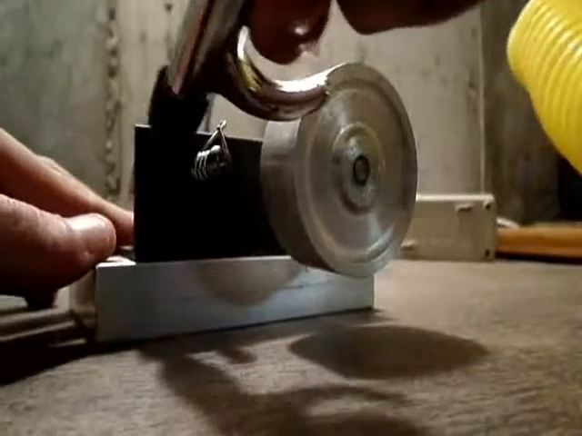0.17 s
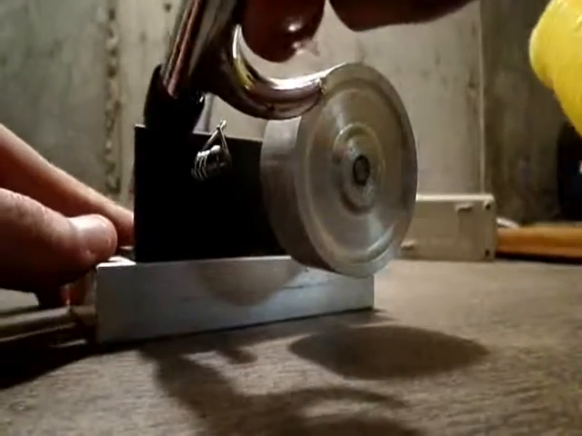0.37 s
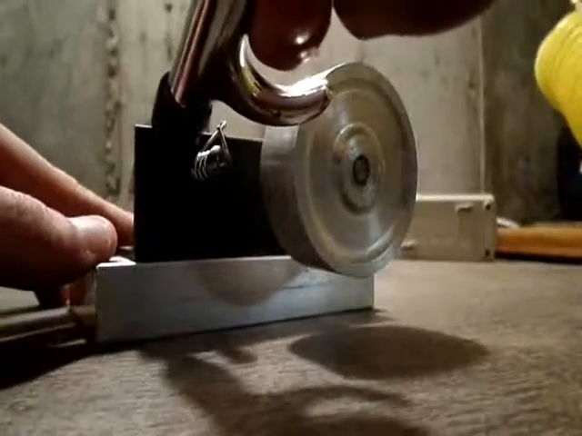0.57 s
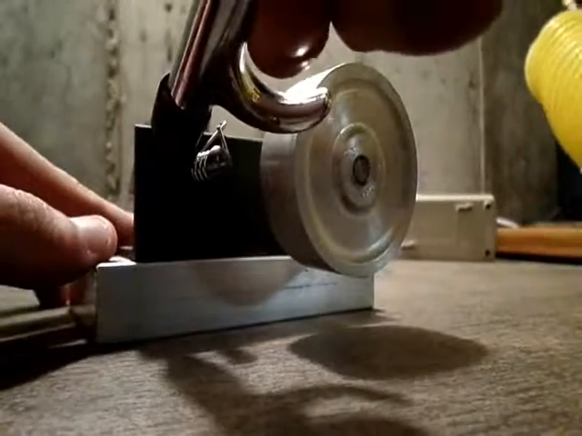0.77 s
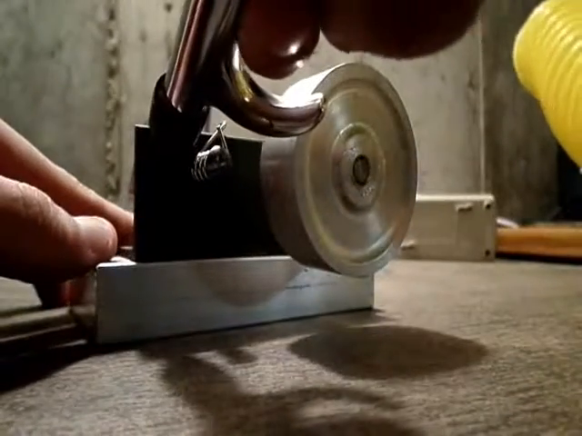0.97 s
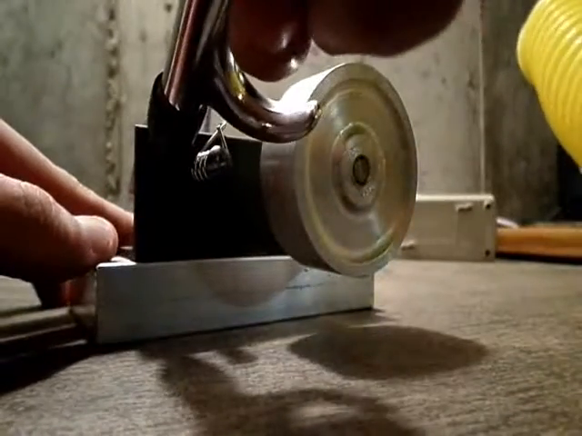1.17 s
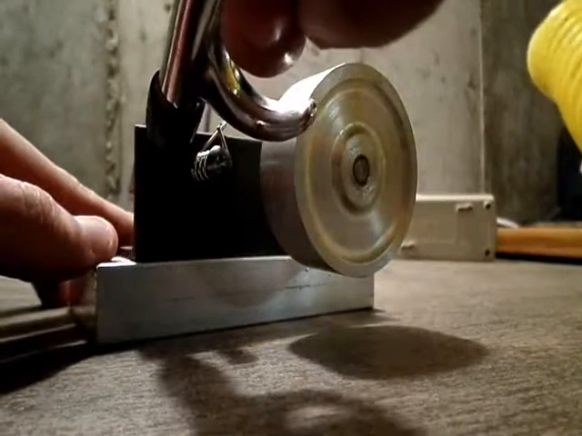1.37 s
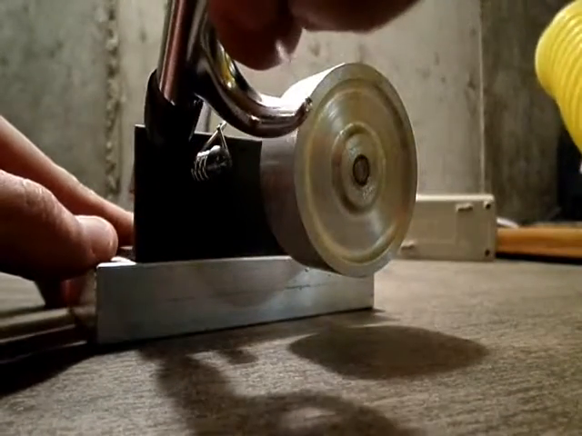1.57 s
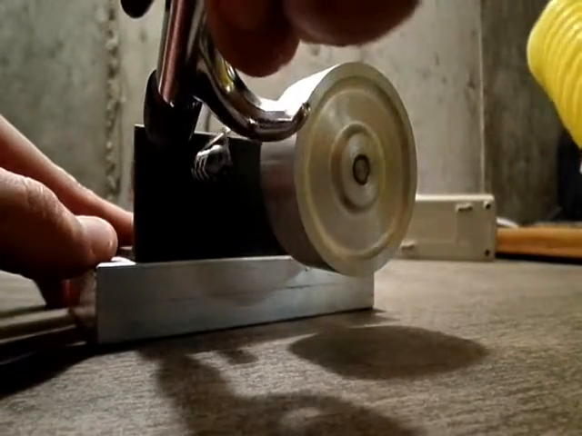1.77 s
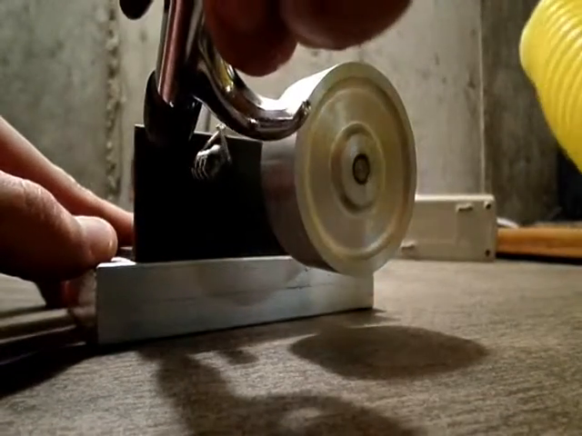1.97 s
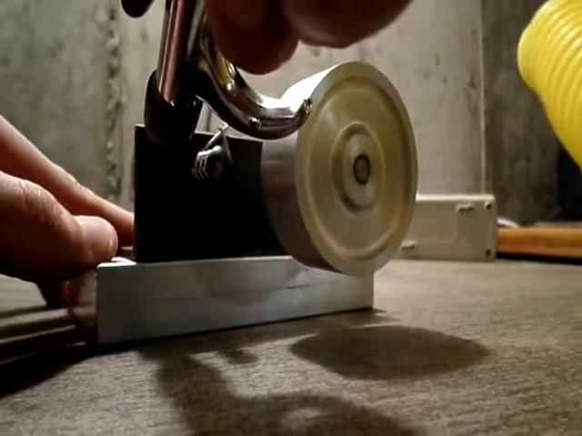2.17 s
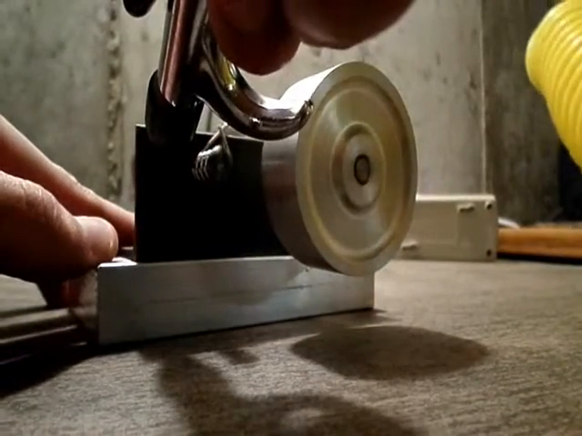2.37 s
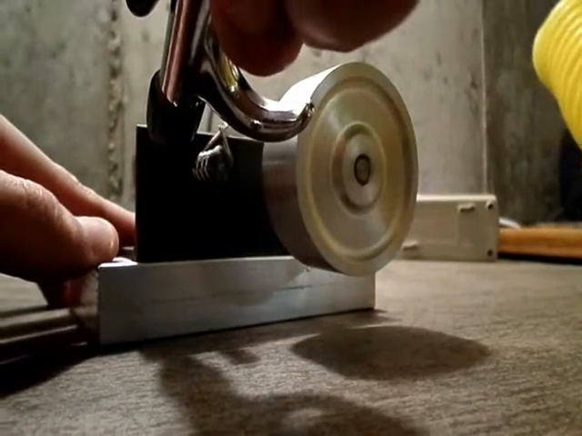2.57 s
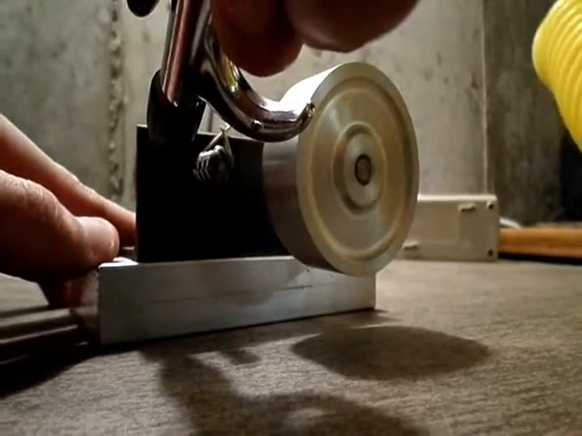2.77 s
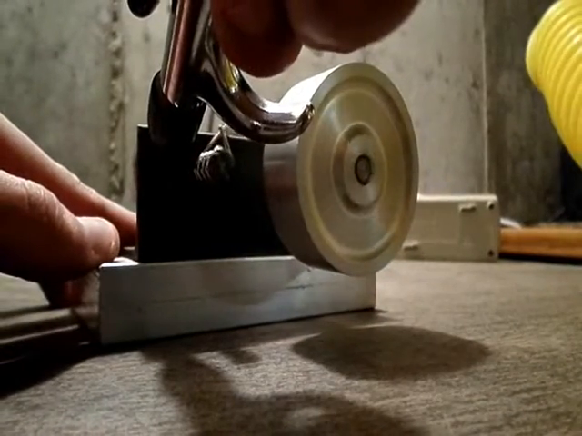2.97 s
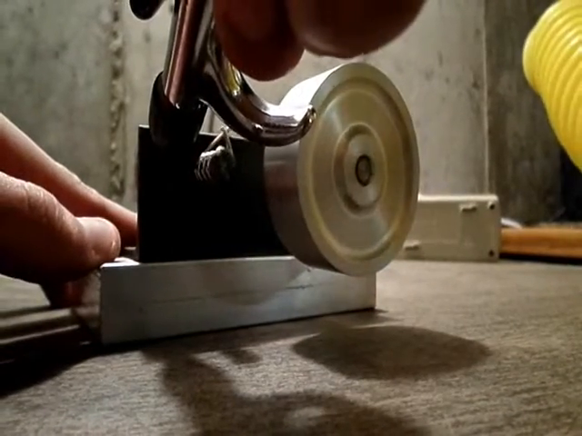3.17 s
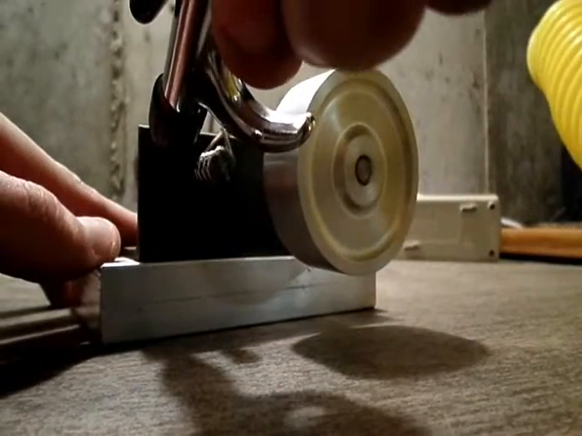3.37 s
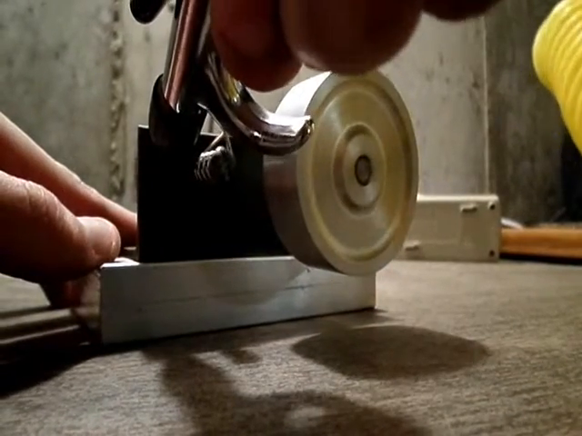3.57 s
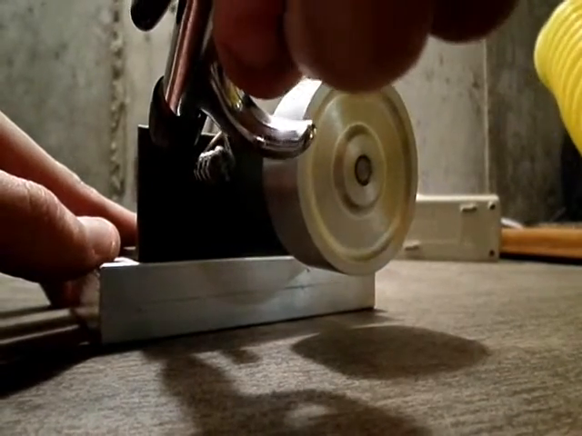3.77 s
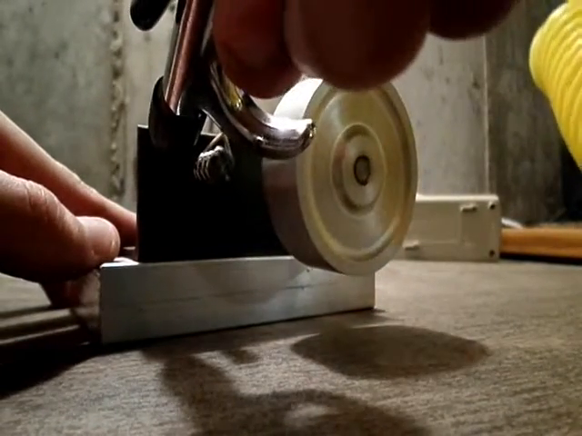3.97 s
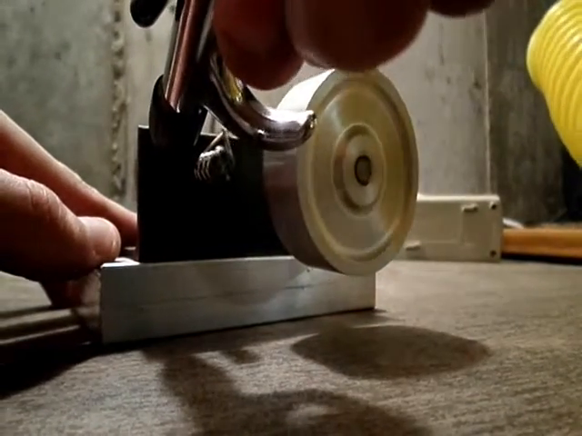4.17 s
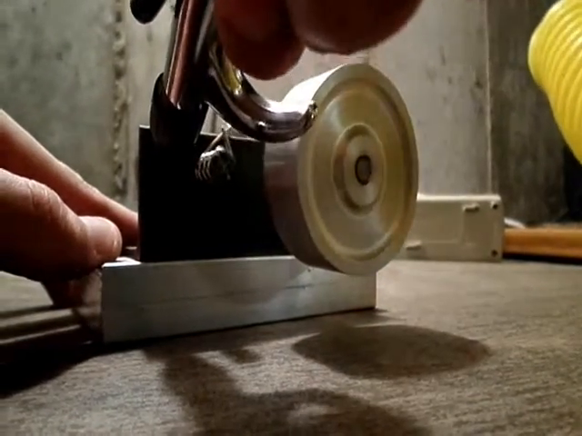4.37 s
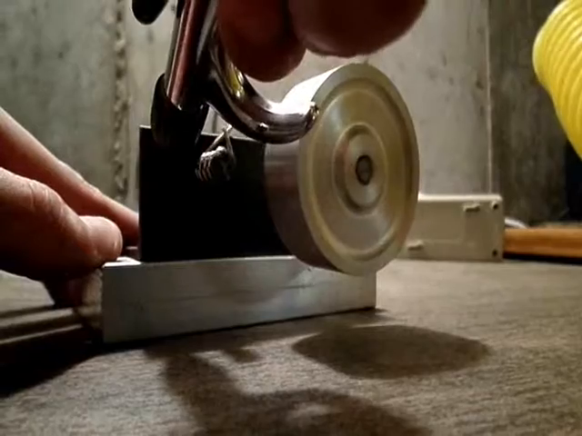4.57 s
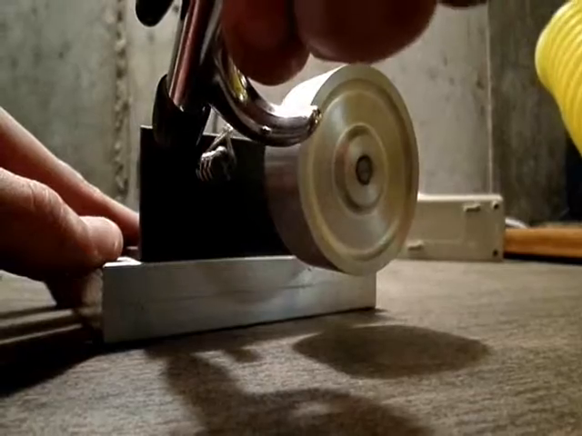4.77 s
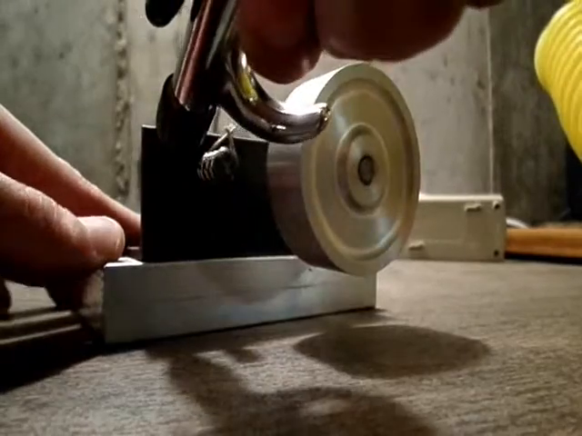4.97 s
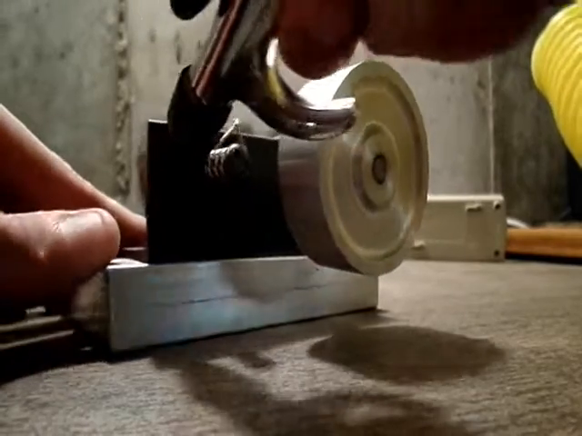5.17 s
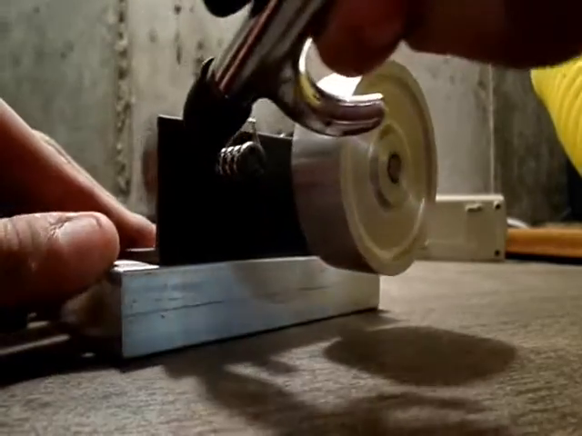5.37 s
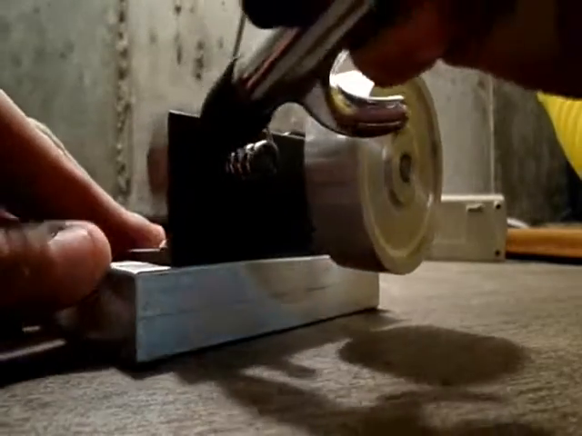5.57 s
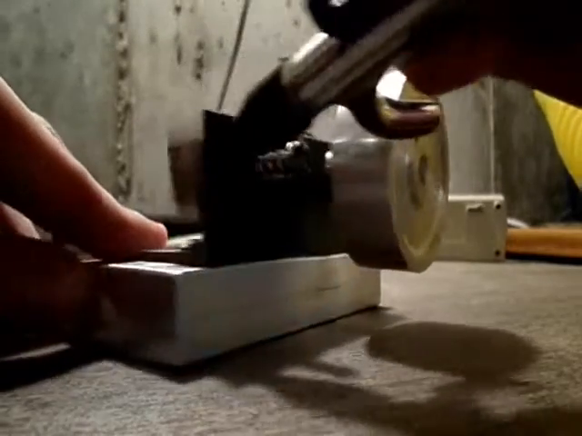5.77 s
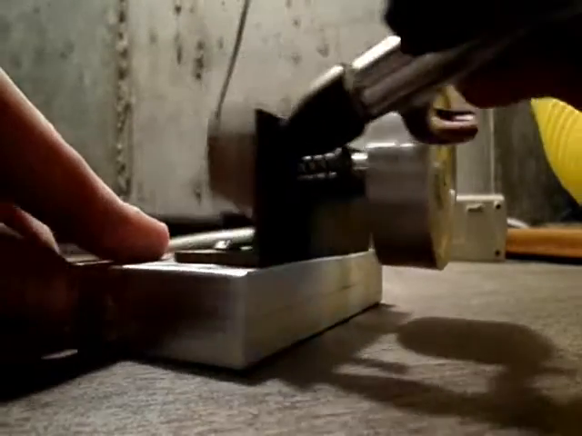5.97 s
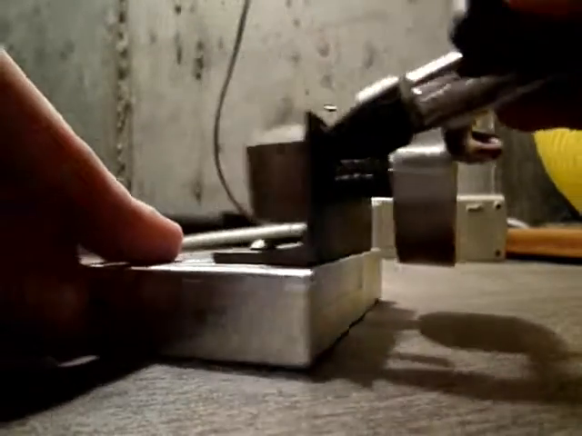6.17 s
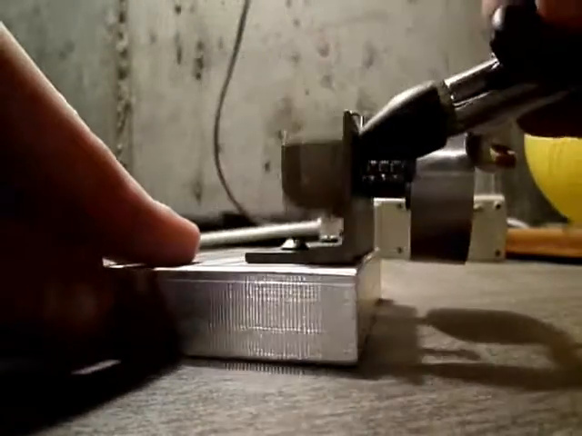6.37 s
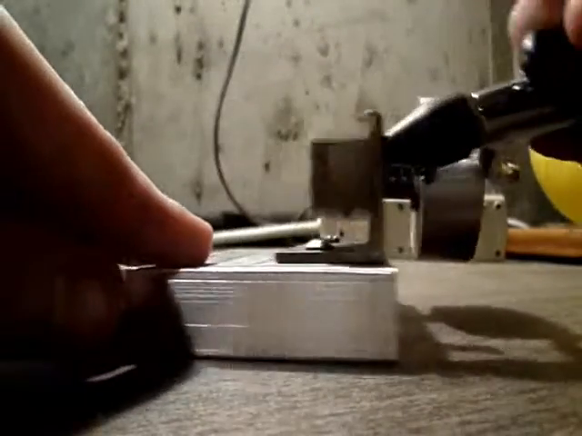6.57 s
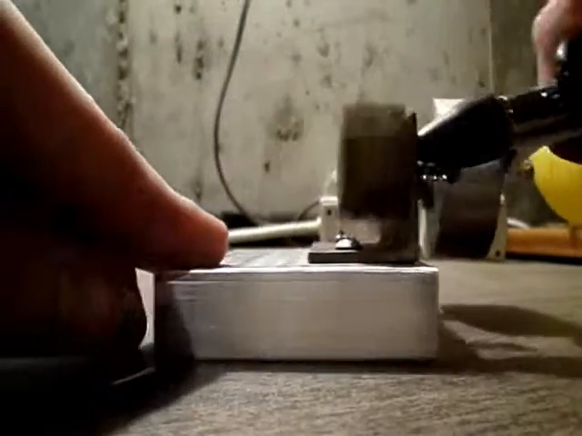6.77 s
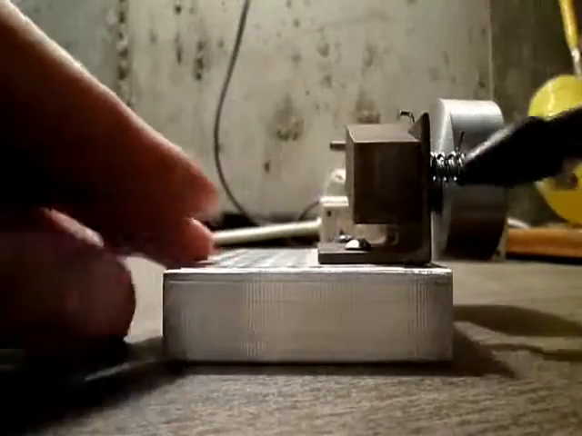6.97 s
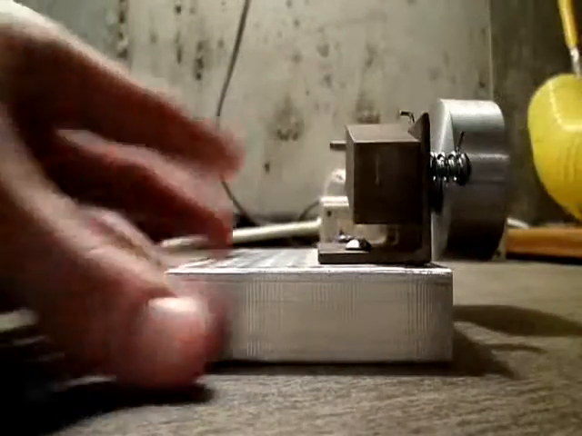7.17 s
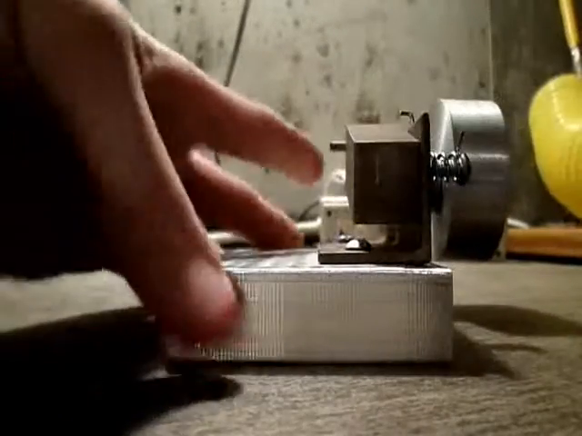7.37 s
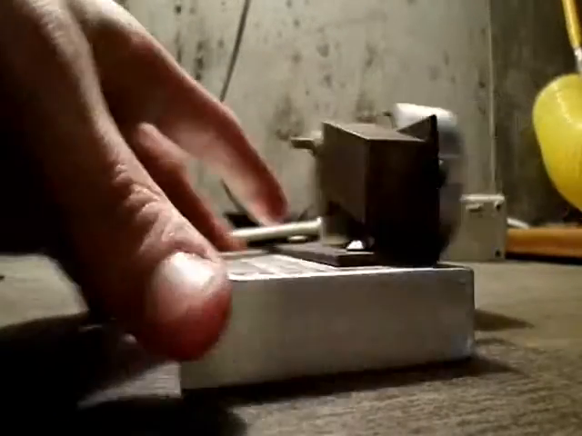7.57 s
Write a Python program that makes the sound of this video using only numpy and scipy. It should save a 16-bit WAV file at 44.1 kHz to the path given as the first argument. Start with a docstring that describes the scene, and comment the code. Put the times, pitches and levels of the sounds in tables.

```python
"""First a metal base knocks on a workbench over humming room air; light ticks follow as a nozzle is seated.
A blow gun then feeds a small compressed-air engine: its jet spits hard at first and hisses throughout.
Each turn of the flywheel gives a whistle (swept sine) that falls to a squeak, and an exhaust puff and low pops
(gated, coloured noise), and drums on the bench (resonators). The engine slows, with hard thumps as the exhaust
opens, and stops; the air is shut off and a thin whistle sinks away."""
import sys
import numpy as np
from scipy import signal
from scipy.fft import rfft, irfft, next_fast_len
from scipy.io import wavfile
from scipy.ndimage import uniform_filter1d

SR = 44100
rng = np.random.default_rng(int(sys.argv[2]) if len(sys.argv) > 2 else 0)


def generate_wav(signal):
    """Clip the signal to [-1, 1] and save it as 16-bit WAV at the path in sys.argv[1]."""
    frames = np.transpose(np.atleast_2d(signal))
    scaled = np.clip(frames, -1, 1) * 32767
    pcm = np.round(scaled).astype(np.int16)
    wavfile.write(sys.argv[1], SR, pcm)


N = 335601
TIME = np.arange(N) / SR  # s


def gain_of(db):
    """Logarithmic level: decibels to amplitude gain."""
    return 10 ** (np.asarray(db) / 20)


def evened(x):
    """Normalization: scales to rms 1."""
    return x / np.sqrt(np.mean(x ** 2) + 1e-20)


def along(points, at):
    """Linear interpolation of rows (place, value)."""
    place, value = np.transpose(points)
    return np.interp(at, place, value)


def read(points, hz):
    """Interpolation of rows (frequency, value) on a logarithmic frequency axis."""
    f, value = np.transpose(points)
    return np.interp(np.log(hz + 1), np.log(f + 1), value)


def noise(colour):
    """Spectral shaping: white noise weighted by a colour, then scaled to rms 1."""
    size = next_fast_len(N)
    hz = np.fft.rfftfreq(size, 1 / SR)
    spectrum = rfft(rng.standard_normal(size)) * gain_of(read(colour, hz))
    return evened(irfft(spectrum, size)[:N])


def wander(rate_hz):
    """Low-passed random fluctuation of rms 1."""
    low_pass = signal.butter(2, rate_hz, fs=SR, output="sos")
    return evened(signal.sosfilt(low_pass, rng.standard_normal(N)))


def sine(hz):
    """Phase is the running sum of a varying frequency."""
    return np.sin(2 * np.pi * np.cumsum(hz) / SR)


def dying(s, db, t60):
    """Free decay: a sudden start, then an exponential fall of 60 dB in t60 seconds."""
    return (TIME >= s) * gain_of(db - 60 * np.clip((TIME - s) / t60, 0, 2))


BLEED_DB_PER_S = 390


def blast(s, rise, length):
    """Flow envelope: it rises, holds, and decays exponentially as pressure bleeds away."""
    return np.clip((TIME - s) / rise, 0, 1) * gain_of(-BLEED_DB_PER_S * np.clip(TIME - s - length, 0, .5))


# Rotation of the flywheel: (time [s], speed [turns/s])
SPEED = [(1.947, 11.866), (2.046, 18.267), (2.591, 18.332), (2.989, 17.858), (3.063, 18.327),
         (3.406, 17.251), (3.762, 18.1), (4.127, 18.166), (4.457, 17.905), (4.547, 17.264), (4.818, 18.11),
         (5.066, 17.937), (5.304, 16.491), (5.84, 14.454), (6.023, 8.243), (6.238, 12.387), (6.439, 10.175),
         (6.563, 12.205)]
FIRST_SQUEAK_S = 1.89
START_S, STOP_S = 1.883, 6.7  # the engine sounds between these times
BRISK_TURNS_PER_S, SLOW_TURNS_PER_S = 15, 12  # between these speeds the stroke changes its character


def flywheel():
    """Phase is integrated speed: turns since the first squeak, running gate, and slowness (0-1)."""
    speed = along(SPEED, TIME)
    turns = np.cumsum(speed) / SR
    running = uniform_filter1d(1. * ((TIME > START_S) & (TIME < STOP_S)), size=100)
    slow = np.clip((BRISK_TURNS_PER_S - speed) / (BRISK_TURNS_PER_S - SLOW_TURNS_PER_S), 0, 1)
    return turns - np.interp(FIRST_SQUEAK_S, TIME, turns), running, slow


def each_turn(turns):
    """Cycle-to-cycle variation: unit-variance chance drawn anew for every turn, with softened steps."""
    stroke = np.round(turns).astype(int)
    return uniform_filter1d(rng.standard_normal(size=256)[stroke - stroke.min()], size=130)


def swells(rows, turn, slow):
    """Periodic modulation: Gaussian swells in each turn, blended from brisk to slow strength."""
    total = 0
    for place, width, brisk_db, slow_db in rows:
        distance = (turn - place + .5) % 1 - .5
        strength = gain_of(brisk_db + (slow_db - brisk_db) * slow)
        total = total + strength * np.exp(-(distance / width) ** 2)
    return total


# Gusts as the ports open and close; places count from the squeak, -0.5 to 0.5:
# (place [turns], half width [turns], brisk level [dB], slow level [dB])
PORT_GUSTS = [(-.27, 0.059, 1.5, -3), (-.13, 0.053, 1.5, -1), (0, .047, 9.5, 2), (.135, .035, 5.5, 11),
              (.44, .05, 2.5, 4.5)]
BETWEEN_GUSTS_DB = -12.5


def port_gusts(turn, slow):
    """Port timing modulates the flow: relative gust strength through each turn, above a constant floor."""
    return gain_of(BETWEEN_GUSTS_DB) + swells(PORT_GUSTS, turn, slow)


def microphone_floor(floor_db=-74):
    """Stationary random noise: a faint steady hiss and rumble."""
    # (frequency [Hz], relative level [dB])
    colour = [(8, 25.5), (30, 16), (110, 1), (300, -3.5), (1200, -3.5), (2500, 0), (6000, -3), (15000, -3.5)]
    return gain_of(floor_db) * noise(colour)


# Level of the background, clear before the engine starts, almost inaudible under and after it:
# (time [s], level [dB])
BACKGROUND_LEVEL = [(0, -45), (.3, -52.5), (.7, -54), (1.8, -53), (2.1, -81), (7.61, -86)]
# Spectrum of the room air: (frequency [Hz], relative level [dB])
ROOM_COLOUR = [(20, -9.5), (65, -4.5), (90, -9.5), (122, -3), (170, -17), (245, -7.5), (330, -14),
               (500, -16), (650, -15.5), (900, -19.5), (1500, -23.5), (4000, -28), (11500, -30),
               (15500, -27.5)]
# Partials of the machine hum: (frequency [Hz], level before trim and background level [dB])
HUM = [(123.8, -60), (247.6, -70.5), (624.5, -68.5), (699.8, -68), (1050, -72.5)]
BEATING_HUM = (120, -66)  # same columns; beats with the lowest partial


def background(hum_db=-2, waver=.35):
    """Broadband room noise plus beating tones: workshop air with a wavering machine hum."""
    level_db = along(BACKGROUND_LEVEL, TIME)
    hum = 0
    for hz, db in [*HUM, BEATING_HUM]:
        swell = 1 + waver * wander(8)
        hum = hum + gain_of(db) * swell * np.sin(2 * np.pi * hz * TIME + .6 * wander(5))
    # the hum follows the background level
    hum_level = np.sqrt(2) * gain_of(hum_db + level_db - along(BACKGROUND_LEVEL, 1))
    return gain_of(level_db) * noise(ROOM_COLOUR) + hum_level * hum


# Reverberation of the workshop: (frequency [Hz], decay time T60 [s])
ECHO_T60 = [(100, 0.52), (1000, 0.27), (5000, 0.22), (15000, .28)]


def echo(x):
    """Reverberation: convolution with a noise tail whose bands decay at their own rates."""
    burst = rng.standard_normal(SR) * (np.arange(SR) > SR * .004)
    hz, t, z = signal.stft(burst, SR, nperseg=256)
    decay = gain_of(-60 * t / read(ECHO_T60, hz)[:, None])
    tail = signal.istft(z * decay, SR, nperseg=256)[1]
    return signal.fftconvolve(x, tail / np.linalg.norm(tail))[:N]


# Small ticks and scrapes of the nozzle being seated:
# (time [s], level [dB], pitch [Hz], bandwidth [Hz], decay time T60 [s])
TICKS = [(0.371, -27.5, 9900, 2400, 0.0094), (.384, -40, 10100, 4000, .01), (.447, -52, 5000, 2500, .015),
         (.585, -49, 10000, 4000, .03), (.623, -34, 1380, 240, 0.02), (.798, -50, 11500, 6000, .03),
         (.945, -57, 11000, 5000, .5), (1.188, -52, 1300, 500, 0.018)]


def ticks():
    """Resonant filtering: dying noise excites a twice-applied band peak, its energy restored."""
    out = np.zeros(N)
    for s, db, hz, width_hz, t60 in TICKS:
        peak = signal.iirpeak(hz, hz / width_hz, fs=SR)
        scrape = dying(s, db, t60)
        ring = signal.lfilter(*peak, signal.lfilter(*peak, scrape * rng.standard_normal(N)))
        out += ring * np.linalg.norm(scrape) / np.linalg.norm(ring)
    return out


# Dull bumps, the one at 5.877 s as the exhaust opens:
# (time [s], level before low-pass [dB], decay time T60 [s], cutoff [Hz])
THUDS = [(0.06, -27, 0.04, 2480), (4.227, -17, 0.052, 2000), (4.687, -19, 0.099, 2000),
         (5.877, -18, 0.044, 2000), (7.548, -56.5, 0.12, 130)]
# Spectrum of the bumps: (frequency [Hz], relative level [dB])
THUD_COLOUR = [(25, -11.5), (70, -4.5), (170, 0.5), (400, 5), (800, -26), (2500, -26.5), (9000, -57.5)]


def thuds():
    """Low-pass filtering dulls a bump: decaying noise bursts with few high frequencies."""
    dull = noise(THUD_COLOUR)
    out = np.zeros(N)
    for s, db, t60, top_hz in THUDS:
        out += signal.lfilter(*signal.butter(2, top_hz, fs=SR), dying(s, db, t60) * dull)
    return out


# Knocks of the metal base at the start, later hard thumps as the exhaust opens in slow turns:
# (time [s], level [dB], decay time T60 [s])
KNOCKS = [(.007, -8.5, 0.043), (0.062, -29.5, 0.041), (5.94, -22.5, 0.044), (6.041, -15.5, 0.058),
          (6.146, -20.5, .05)]
# Spectrum of the knocks and thumps: (frequency [Hz], relative level [dB])
KNOCK_COLOUR = [(30, -27), (120, -12.5), (260, 4), (480, 2.5), (680, 4), (870, -5.5), (1050, -1.5),
                (1500, -25), (3000, -33), (5000, -39), (12000, -45.5), (15000, -57.5)]
# Modes of the base: (frequency [Hz], relative level [dB], decay time T60 [s])
BASE_MODES = [(287, -13, 0.31), (576, 1.5, 0.062), (1290, -14.5, 0.15), (2040, -24, 0.077),
              (2780, -8.5, 0.054), (3265, -18, 0.076), (4269, -34, 0.0743), (4960, -28, 0.12),
              (5360, -39, 0.0975), (5663, -32, 0.15)]


def knocks(crack_db=-11.5, crack_t60=0.016, ring_db=-13):
    """Modal excitation: each knock or thump is a noise burst plus decaying base modes; the first cracks."""
    out = sum(dying(*row) for row in KNOCKS) * noise(KNOCK_COLOUR)
    # (frequency [Hz], relative level [dB])
    crack_colour = [(300, 7.5), (2000, 0), (4600, 2.5), (6000, -2.5), (12000, -10.5), (15000, -23)]
    out += dying(KNOCKS[0][0], crack_db, crack_t60) * noise(crack_colour)
    loudest_db = max(db for hz, db, t60 in BASE_MODES)
    for s, blow_db, _ in KNOCKS:
        for hz, db, t60 in BASE_MODES:
            decay = dying(s, blow_db + ring_db + db - loudest_db, t60)
            out += decay * np.sin(2 * np.pi * hz * (TIME - s))
    return out


# Resonances of the bench top: (frequency [Hz], bandwidth [Hz], relative level [dB])
BENCH = [(128, 41, 6), (150, 19, 4.5), (187, 28, -4.5), (424, 70, -9.5)]
# Chatter of the base on the bench: (time [s], level [dB])
CHATTER = [(1.88, -50), (2.1, -31), (2.6, -43), (4.15, -36), (4.32, -26), (4.45, -37.5), (5.2, -31.5),
           (5.6, -38), (6.1, -56.5)]


def bench(turn, slow):
    """Forced vibration: the piston's noisy jolts drive the bench top's resonances."""
    jolts = port_gusts(turn, slow) * rng.standard_normal(N)
    drum = 0
    for hz, width, db in BENCH:
        resonance = signal.iirpeak(hz, hz / width, fs=SR)
        drum = drum + gain_of(db) * evened(signal.lfilter(*resonance, jolts))
    return gain_of(along(CHATTER, TIME)) * evened(drum)


# The jet sweeps past the microphone as the nozzle is brought up and pulled away:
# (time [s], rise and hold end [s after time], level [dB])
GUSTS = [(1.81, .07, -43), (6.837, 0.238, -38.5)]


def gust(lumps_db=2):
    """Turbulent wind noise: the low, uneven roar of a passing jet, swelling as it comes near."""
    level = sum(gain_of(db) * blast(s, length, length) for s, length, db in GUSTS)
    # (frequency [Hz], relative level [dB])
    colour = [(25, -6.5), (120, -3), (550, 2), (1400, -14), (4000, -30.5)]
    return level * gain_of(lumps_db * wander(60)) * noise(colour)


# Thin whistle once the valve has closed: (time [s], pitch [Hz], peak level [dB])
SEEP = [(7.15, 3700, -89.5), (7.26, 3200, -73), (7.36, 2840, -78), (7.455, 2650, -77), (7.48, 2460, -79.5),
        (7.61, 2430, -77.5)]


def seep(waver_hz=60, wobble_hz=45, flutter_db=2.0):
    """Flow-excited whistle: a faint tone sinks in pitch as the last pressure bleeds away."""
    s, hz, db = np.transpose(SEEP)
    pitch = np.interp(TIME, s, hz) + waver_hz * wander(200) + wobble_hz * wander(20)
    level = gain_of(np.interp(TIME, s, db) + flutter_db * wander(30))
    return level * (TIME > s[0]) * sine(pitch)


# Air escaping round the nozzle: (time [s], level [dB])
LEAK = [(1.82, -38.5), (1.879, -29), (1.89, -20.5), (2.41, -17.5), (2.45, -22), (5.1, -22), (5.7, -18.8),
        (6.58, -20), (6.615, -25), (6.93, -26.5), (7.08, -18.5)]
# Spectrum of the leak: (frequency [Hz], relative level [dB])
LEAK_COLOUR = [(30, -16), (200, -18.5), (900, -15), (3000, -14.5), (6500, -14.5), (8500, -9.5), (10000, -7),
               (11500, -1.5), (13000, -3.5), (14800, -3), (16000, -12.5)]
AIR_ON_S, VALVE_RISE_S, AIR_OFF_S = 1.81, .009, 7.095


def leak(flutter_db=0.84, waver_db=1.05):
    """Jet turbulence: hiss round the nozzle while the valve is open and as the hose bleeds empty."""
    valve = blast(AIR_ON_S, VALVE_RISE_S, AIR_OFF_S - AIR_ON_S)
    level_db = along(LEAK, TIME) + flutter_db * wander(240) + waver_db * wander(38)
    return valve * gain_of(level_db) * noise(LEAK_COLOUR)


# The nozzle lifts off its seat and spits: (time [s], length [s], level [dB])
SPITS = [(1.884, 0.021, -4.5), (1.915, 0.028, -14.5), (1.948, 0.047, -4.5), (1.993, 0.013, -10),
         (2.032, 0.051, -3), (2.114, 0.049, -4), (2.193, .058, -4), (2.278, 0.045, -2),
         (2.357, 0.056, -3.5)]
# Spectrum of the spits: (frequency [Hz], relative level [dB])
SPIT_COLOUR = [(20, -7.5), (150, -10.5), (600, -11), (2500, -11.5), (6500, -12), (9500, -7.5), (11500, -4),
               (13700, 1), (16000, -11)]


def spits(rise=0.0011, fall=0.017, flutter_db=2.0):
    """Intermittent jet noise: full line pressure blows past the nozzle in short, ragged blasts."""
    level = 0
    for s, length, db in SPITS:
        onset = np.clip((TIME - s) / rise, 0, 1)
        # the decay begins one fall time before the stated end
        decay = np.exp(-np.clip((TIME - s - length) / fall + 1, 0, 20))
        level = level + gain_of(db) * onset * decay
    return level * gain_of(flutter_db * wander(140)) * noise(SPIT_COLOUR)


# Low pops of air: (time [s], level before trim [dB])
POP_LEVEL = [(2, -20), (2.5, -28.5), (4.2, -28.5), (4.6, -31.5), (5.5, -29), (6.5, -31.5), (6.68, -48)]
# Spectrum of the pops: (frequency [Hz], relative level [dB])
POP_COLOUR = [(15, -16.5), (40, -1), (140, -0.5), (300, -3), (600, -6), (1200, -10), (2200, -16),
              (4000, -26), (9000, -42.5)]
POP_SPREAD_DB = 1.0  # from turn to turn


def pops(turns, slow, trim_db=-2.5, lumps_db=2, scatter=0.0064):
    """Unsteady port flow: each opening and closing throws a low, lumpy gust."""
    db = along(POP_LEVEL, TIME) + trim_db + POP_SPREAD_DB * each_turn(turns) + lumps_db * wander(140)
    return port_gusts(turns + scatter * wander(25), slow) * gain_of(db) * noise(POP_COLOUR)


# Exhaust puffs: (time [s], level before trim [dB])
EXHAUST_LEVEL = [(1.9, -21), (2.6, -28.5), (3.3, -27), (4.05, -33.5), (4.45, -26.5), (5.3, -27),
                 (5.47, -19.5), (5.68, -23), (6.05, -18.5), (6.53, -22), (6.68, -46)]
# Spectrum of the exhaust: (frequency [Hz], relative level [dB])
EXHAUST_COLOUR = [(30, -18.5), (400, -11.5), (1500, -7.5), (4000, -8), (6800, -9.5), (9000, -4),
                  (11500, 2.5), (13000, 1.5), (16000, -5)]
EXHAUST_SPREAD_DB = 1.0  # from turn to turn
# in turns; the opening counts from the squeak, the hold from the opening
EXHAUST_OPENS, EXHAUST_RISE_TURNS, EXHAUST_HOLD_TURNS, EXHAUST_FALL_TURNS = .055, .065, .33, .14


def exhaust(turns, trim_db=4, flutter_db=0.5):
    """Pulsed jet noise: once a turn the port opens, stays open, and the flow of spent air dies away."""
    since = (turns - EXHAUST_OPENS) % 1
    opening = np.minimum(since / EXHAUST_RISE_TURNS, 1)
    puff = opening * np.exp(-np.maximum(since - EXHAUST_HOLD_TURNS, 0) / EXHAUST_FALL_TURNS)
    chance_db = EXHAUST_SPREAD_DB * each_turn(turns - .5) + flutter_db * wander(180)
    return puff * gain_of(along(EXHAUST_LEVEL, TIME) + trim_db + chance_db) * noise(EXHAUST_COLOUR)


# Reflections of the jet from near surfaces: (delay [s], level relative to the direct sound [dB])
BOUNCES = [(.00052, -28.5), (.00135, -29), (.0023, -24), (.0041, -18.5), (.0067, -14.5), (.0098, -16.5)]


def reflect(x):
    """Comb filtering: bench, base and wall return the jet within milliseconds."""
    return x + sum(gain_of(db) * np.r_[np.zeros(round(delay * SR)), x][:N] for delay, db in BOUNCES)


def squeak_thump(squeal, size_db=-3.5, low_hz=150, high_hz=1400):
    """Square-law demodulation: each squeak, squared, saturated and band-passed, gives a low thump and rebound."""
    band = signal.butter(1, [low_hz, high_hz], "band", fs=SR, output="sos")
    return gain_of(size_db) * signal.sosfilt(band, np.tanh(squeal ** 2))


# Squeak that ends each inlet stroke: (time [s], level [dB])
SQUEAK_LEVEL = [(1.9, -4.5), (2.2, 0), (2.47, -10.5), (5.4, -11), (5.85, -16.5), (6.03, -31), (6.22, -32),
                (6.4, -15), (6.66, -18)]
# Whistle that leads into the squeak: (time [s], level before swells [dB])
WHISTLE_LEVEL = [(1.95, -11), (2.3, -9), (2.55, -15.5), (3.4, -18.5), (4.13, -14), (4.32, -21.5),
                 (5.1, -28.5), (5.8, -26), (6, -20), (6.13, -25.5), (6.3, -15), (6.57, -15), (6.63, -40.5)]
# Swells while the inlet is open; slow turns give the whistle time to build early:
# (place [turns from squeak], half width [turns], brisk level [dB], slow level [dB])
SWELLS = [(-.385, .045, -8, 0.5), (-.26, .04, -3.5, 1.5), (-.11, .06, 4, 0)]
SQUEAK_SPREAD_DB, WHISTLE_SPREAD_DB = 0.6, 1.82  # from turn to turn
# the squeak's pitch target sinks as the whistle grows stronger
SQUEAK_HZ, SQUEAK_SPREAD_HZ, USUAL_WHISTLE_DB, SINK_HZ_PER_DB = 11370, 140, -18, 19
DROP_TURNS, RECOVER_TURNS = .08, .19  # the pitch dives into the squeak and hooks back up
SQUEAK_PLACE, SQUEAK_HALF_TURNS = .004, .066  # turns, before the brevity scaling


def whistle(turns, turn, slow, top_hz=14750, sag_hz=450, jitter_hz=330, drift_hz=230,
            flutter_db=2, grain_db=1.3, dive=1.147):
    """Flow-excited port tone: its pitch drops as the rocking cylinder slides across the hole."""
    squeak_db = along(SQUEAK_LEVEL, TIME) + SQUEAK_SPREAD_DB * each_turn(turns)
    lead_db = along(WHISTLE_LEVEL, TIME) + WHISTLE_SPREAD_DB * each_turn(turns)
    sink_hz = SINK_HZ_PER_DB * (lead_db - USUAL_WHISTLE_DB)
    squeak_hz = SQUEAK_HZ - sink_hz + SQUEAK_SPREAD_HZ * each_turn(turns)
    start_hz = top_hz - sag_hz * slow
    # a dive above 1 carries the pitch past its target
    drop = dive * np.exp(-abs(turn) / np.where(turn < 0, DROP_TURNS, RECOVER_TURNS))
    hz = start_hz + (squeak_hz - start_hz) * drop + jitter_hz * wander(1200) + drift_hz * wander(90)
    # with little whistle before it, the squeak is a shorter blip
    brevity = along([(4, 1), (15, 1.2)], squeak_db - lead_db)
    distance = (turn * brevity - SQUEAK_PLACE) / SQUEAK_HALF_TURNS
    blip = brevity * np.exp(-np.square(distance ** 2))
    lead = swells(SWELLS, turn, slow) * gain_of(lead_db + flutter_db * wander(200))
    level = gain_of(squeak_db) * blip + lead
    return np.sqrt(2) * level * gain_of(grain_db * wander(900)) * sine(hz)


def scene(air_echo_db=-20, blows_echo_db=-11, jet_db=-0.11):
    """Superposition: engine, nozzle and blows, with their reverberation, in two identical channels."""
    turns, running, slow = flywheel()
    turn = turns - np.round(turns)  # place within the turn, -0.5 to 0.5
    squeal = running * whistle(turns, turn, slow)
    hiss = gain_of(jet_db) * reflect(running * exhaust(turns) + leak() + spits())
    low_beats = running * (pops(turns, slow) + bench(turn, slow))
    engine = squeal + hiss + gust() + squeak_thump(squeal) + low_beats
    blows = knocks() + thuds() + ticks()
    room = echo(gain_of(air_echo_db) * engine + gain_of(blows_echo_db) * blows) + background()
    mono = engine + blows + room + seep() + microphone_floor()
    return np.array([mono, mono])


EDGE_HZ = 15880


def record(dry):
    """Clipping and band limiting: peaks beyond full scale are cut flat, then low-passed."""
    low_pass = signal.firwin(511, EDGE_HZ, window=("kaiser", 9), fs=SR)
    return signal.oaconvolve(np.clip(dry, -1, 1), low_pass[None], "same")


dry = scene()
out = record(dry)
generate_wav(out)
```